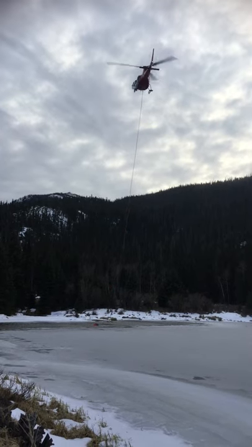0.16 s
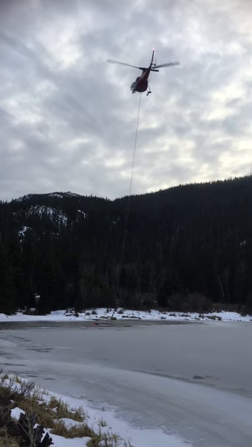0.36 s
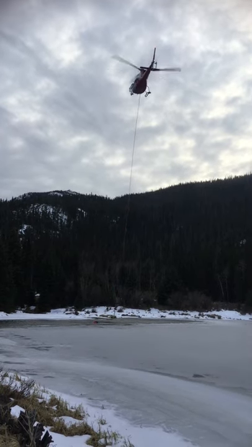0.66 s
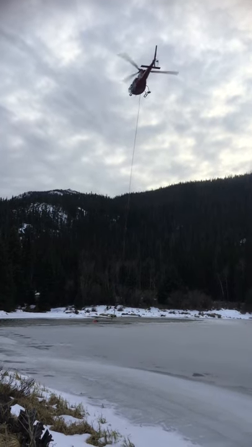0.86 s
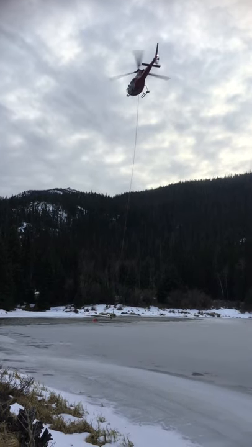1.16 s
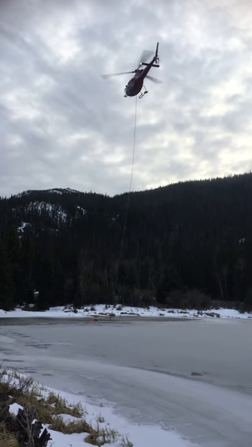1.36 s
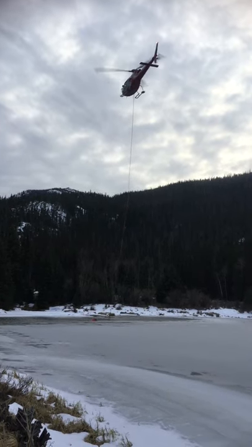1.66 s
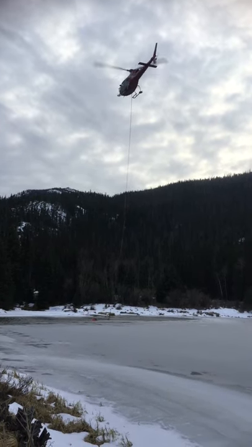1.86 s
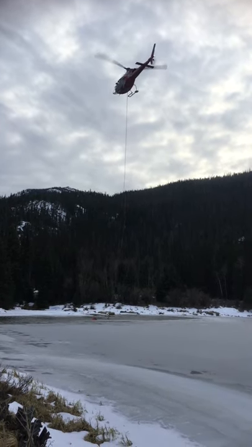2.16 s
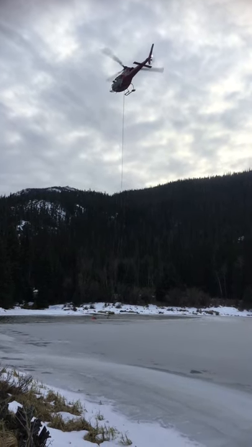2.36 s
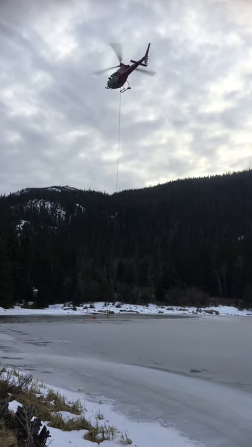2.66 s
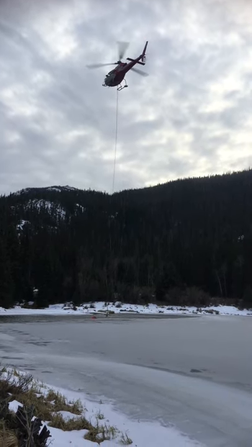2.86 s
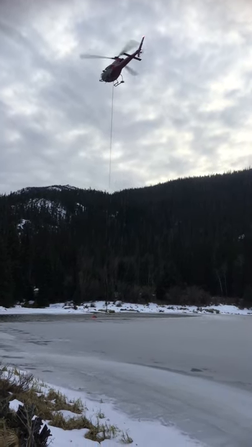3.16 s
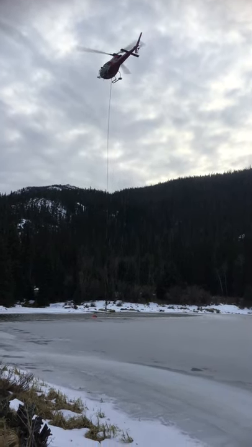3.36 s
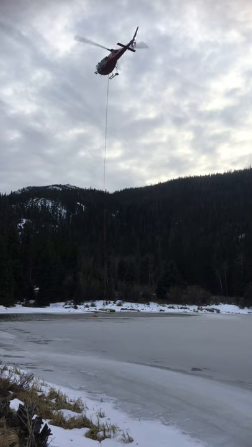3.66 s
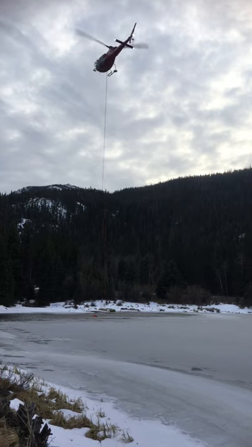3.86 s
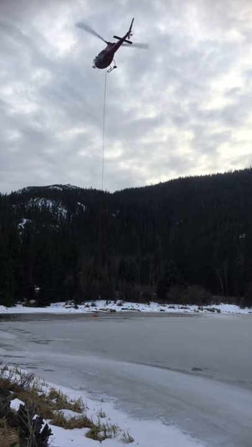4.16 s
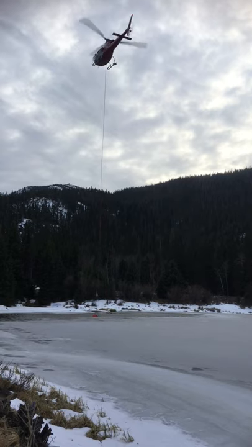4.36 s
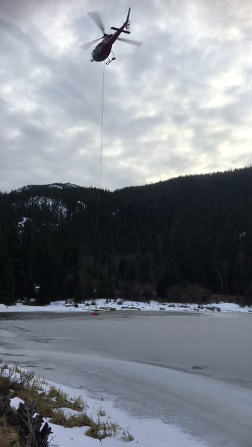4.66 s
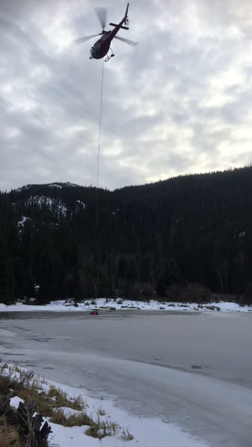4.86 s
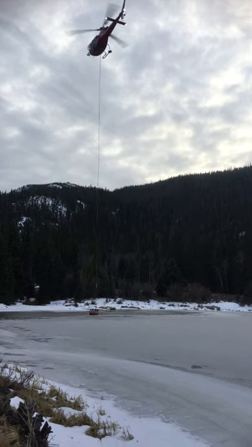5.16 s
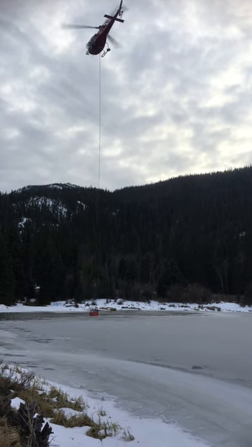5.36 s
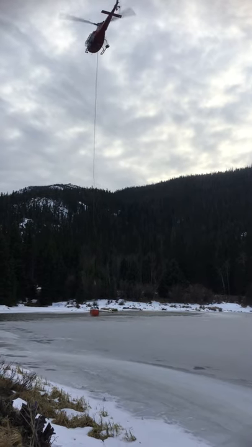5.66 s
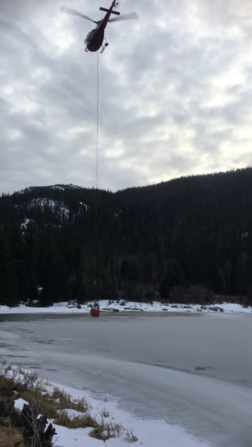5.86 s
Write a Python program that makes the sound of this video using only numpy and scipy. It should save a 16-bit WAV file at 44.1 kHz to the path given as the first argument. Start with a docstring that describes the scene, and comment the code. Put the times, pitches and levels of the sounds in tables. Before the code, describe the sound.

From 0 s a light turbine helicopter is already hovering in open air over a frozen lake, heard from the shore. Its main blades slap about nineteen times a second, each a short hollow knock around 450-500 Hz with low thump, ragged bark and dry crack. Beneath run a wavering tail rotor hum near 137 Hz with higher harmonics, deep rumble, soft hiss and faint fuzzy gear tones. The slaps vary in weight; from about 2.3 to 3.8 s cracks become sharper, the hardest near 3.4 s. They weaken towards 4 s and nearly disappear by 4.4 s. Until about 5.5 s the hum, rumble and hiss remain, with a thin, flickering whine near 8.6 kHz and a fainter whistle above; hiss swells around 5.1 s. At about 5.6 s strong slapping abruptly returns and continues to the cut at 6 s. A dull echo follows within milliseconds, giving a slightly hollow colour.

```python
"""On the shore of a frozen lake, a light turbine helicopter is heard hovering over the ice.
The main blades slap through their own wake, fade as the craft turns and come back hard: each slap is
built from short waves, noise and a crack. The tail rotor hums in harmonics, the gears and turbine sound as
fuzzy tones, and shaped noise makes the rumble and hiss. The ice returns a dull echo milliseconds later."""
import sys
import numpy as np
from scipy import signal
from scipy.io import wavfile
from scipy.ndimage import uniform_filter1d

SR = 44100
rng = np.random.default_rng(int(sys.argv[2]) if len(sys.argv) > 2 else 0)


def master_out(mix):
    """Clip the mix to full scale and print it as 16-bit PCM to the path in sys.argv[1]."""
    frames = np.transpose(np.atleast_2d(mix))
    ceiling = np.clip(frames, -1, 1)
    pcm = np.round(ceiling * 32767).astype(np.int16)
    wavfile.write(sys.argv[1], SR, pcm)


def invert_db(x):
    """Field ratio 10**(x/20) for x, a level in decibels (scalar or array-like)."""
    u = np.asarray(x, float) / 20
    return 10 ** u


N = 265482
TIME = np.arange(N) / SR  # seconds
BLADES_HZ = 19.46  # average rate of main blade passes

# How late the echo off the ice arrives: time_s, delay_ms
ICE_ECHO = [(0, 6.08), (2.5, 6.16), (4, 5.804), (5, 6.4), (6.02, 6.52)]


def curve(rows):
    """Joins the columns of a table by straight lines in time; the first column is the time."""
    time_s, *columns = np.transpose(rows)
    return [np.interp(TIME, time_s, column) for column in columns]


def evened(x):
    """Scales to rms 1, so that a level can be set afterwards."""
    return x / np.sqrt(np.mean(x ** 2) + 1e-20)


def add(mix, time_s, sound):
    """Mixes a sound in, centred on time_s and cut off at the ends of the mix."""
    start = round(time_s * SR) - len(sound) // 2
    part = mix[max(start, 0):start + len(sound)]
    part += sound[max(-start, 0):][:len(part)]


def resonate(x, hz, width_hz):
    """Keeps a band around hz: shifts it down to zero, smooths twice (width_hz each) and shifts it back."""
    turn = np.exp(2j * np.pi * np.cumsum(hz * np.ones(len(x))) / SR)
    r = np.exp(-np.pi * width_hz / SR)
    low = x / turn
    for _ in range(2):
        low = signal.lfilter([1 - r], [1, -r], low)
    return evened((turn * low).real)


def wander(per_s):
    """A random curve of rms 1 that takes per_s new values each second."""
    count = int(7 * per_s) + 2
    return evened(np.interp(TIME * per_s, np.arange(count), rng.standard_normal(count)))


def noise(spectrum, patchy_db, size):
    """Noise from random short-time spectra, with patches that swell and fade by patchy_db (rms)."""
    frames, hz = N * 4 // size + 5, np.fft.rfftfreq(size, 1 / SR)
    real, imaginary, patches = rng.standard_normal((frames, len(hz), 3)).T
    patches = uniform_filter1d(patches, size=6, axis=0)  # across pitch
    patches = evened(uniform_filter1d(patches, size=12, axis=1))  # across time
    table_hz, table_db = np.transpose(spectrum)
    shape_db = np.interp(np.log(hz + 1), np.log(table_hz), table_db)[:, None]
    z = (real + 1j * imaginary) * invert_db(shape_db + patchy_db * patches)
    return evened(signal.istft(z, nperseg=size, noverlap=size * 3 // 4)[1][:N])


def blade_turns():
    """Blade passes counted from the start, a whole number at each slap."""
    # The slap drifts against the even rotor clock: time_s, late_ms
    lag = [(0, -3.5), (0.4, -4.5), (0.8, -3.5), (1.2, -4), (1.6, -2.5), (2, -0.5), (2.4, 1.26), (2.8, 1.27),
           (3.2, -0.84), (3.6, -2), (4, -5), (4.3, -8), (5.6, -0.5), (6.02, -2)]
    return (TIME - curve(lag)[0] / 1000) * BLADES_HZ


def gate(turns, place, sharp):
    """A bump once a blade pass, at the share "place" of a pass after the slap."""
    return np.exp(sharp * (np.cos(2 * np.pi * (turns - place)) - 1))


def rotor_beat(turns):
    """The loaded blades push the air in a low beat, made of the lowest multiples of the blade rate."""
    # Mix of the beat: multiple, relative_level_db
    beat = [(1, -19), (2, -4.5), (3, 0), (4, 0)]
    # Level of the whole beat: time_s, level_db
    push = [(0, -39.5), (1.39, -31.5), (2.83, -37), (6.02, -39)]
    waves = sum(invert_db(db) * np.cos(2 * np.pi * multiple * (turns - .3)) for multiple, db in beat)
    return invert_db(curve(push)[0]) * evened(waves)


def tail_rotor():
    """The tail blades hum at multiples of their rate, each wavering in the downwash."""
    # Tail rotor: time_s, blade_rate_hz, level_db
    tail = [(0, 68.9, -30.5), (.8, 69.42, -25), (1.5, 67.96, -30.5), (2.3, 68.6, -26), (3, 67.44, -30.5),
            (3.7, 68.14, -23.5), (4.5, 69.78, -24.5), (5.2, 69.24, -25), (6.02, 68.54, -27)]
    # Mix of the hum before wavering: multiple, relative_level_db
    tail_orders = [(1, -25), (2, 2), (3, -3), (4, -11), (5, -10.5), (6, -16), (7, -17)]
    hz, level_db = curve(tail)
    tail_turns = np.cumsum(hz) / SR
    hum = 0
    for multiple, db in tail_orders:
        hum = hum + invert_db(db + 0.5 * wander(6.9)) * np.cos(2 * np.pi * multiple * tail_turns)
    return invert_db(level_db) * hum


def gearbox():
    """Meshing gear teeth give faint, slightly fuzzy tones: narrow bands of noise."""
    # Gear tones, before they waver: pitch_hz, level_db
    gears = [(1505, -53.5), (1715, -55)]
    return sum(invert_db(db + 2.4 * wander(2.7)) * resonate(rng.standard_normal(N), hz, 87) for hz, db in gears)


def air(turns):
    """The downwash rumbles; the exhaust hisses and swells as a blade swishes past."""
    # Air and exhaust, the hiss before its swells: time_s, rumble_db, hiss_db
    air_levels = [(0.0, -23, -41.5), (1.78, -25, -40.5), (3.15, -23, -40), (4.26, -26, -41.5),
                  (5.13, -25, -37), (6.02, -24, -41.5)]
    # Tone colour of the rumble: pitch_hz, relative_level_db
    rumble_colour = [(30, -38), (90, -17.5), (170, -1), (215, 3), (255, -10), (320, -8.5), (390, -13),
                     (500, -9.5), (660, -18), (810, -17), (1300, -30.5), (2200, -48.5)]
    # Tone colour of the hiss: pitch_hz, relative_level_db
    hiss_colour = [(500, 6.5), (1200, -8.5), (2800, 3), (4000, -3.5), (7500, -7.5), (10500, -6.5),
                   (12000, -31), (13500, -30), (16000, -16.5)]
    rumble_db, hiss_db = curve(air_levels)
    rumble = invert_db(rumble_db) * noise(rumble_colour, patchy_db=1.0, size=2048)
    swish = 1 + .5 * gate(turns, 0.28, 6.4)
    hiss = invert_db(hiss_db) * swish * noise(hiss_colour, patchy_db=1.35, size=512)
    return rumble + hiss


def turbine(turns):
    """The turbine gives two tones, made fuzzy as the moving air scatters them."""
    # Whine heard when the intake faces the shore, before flares and wavering: time_s, pitch_hz, level_db
    whine_path = [(0, 8310, -48.5), (.47, 8460, -44), (1.75, 9000, -55.5), (1.87, 8700, -45.5),
                  (2.5, 8760, -42.5), (2.68, 9000, -64), (3.96, 8680, -61), (4.05, 8700, -43),
                  (4.46, 8550, -46.5), (4.52, 8540, -42.5), (5.0, 8620, -41.5), (5.3, 8700, -39.5),
                  (5.58, 8800, -48), (6.02, 8660, -65)]
    # Brief flares of the whine: middle_s, half_length_s, rise_db
    flares = [(1.89, .03, 7), (2.085, 0.015, 14), (2.244, .01, 14), (2.287, .02, 9), (2.4, 0.047, 6.5),
              (2.49, 0.011, 8), (4.105, 0.0083, 12.5), (4.256, .012, 11), (4.57, 0.074, 11),
              (4.695, 0.021, 10), (4.93, 0.01, 13.5), (5.167, 0.01, 15), (5.325, .015, 8.5)]
    # Higher whistle that each passing blade uncovers: time_s, pitch_hz, level_db
    whistle_path = [(0, 10200, -61), (.99, 10500, -48), (1.31, 11100, -60), (2.4, 11000, -53),
                    (4.39, 10800, -50.5), (4.71, 10400, -47.5), (6.02, 11300, -58)]
    hz, db = curve(whine_path)
    flare_db = sum(rise_db * np.exp(-((TIME - s) / length) ** 2) for s, length, rise_db in flares)
    whine = invert_db(db + flare_db + 2.0 * wander(40)) * resonate(rng.standard_normal(N), hz, 450)
    hz, db = curve(whistle_path)
    chop = evened(0.26 + gate(turns, 0.39, 5.3) * invert_db(3.7 * wander(17)))
    whistle = invert_db(db) * chop * resonate(rng.standard_normal(N), hz, 670)
    return whine + whistle


def train(t, hz, length_s, slowing):
    """A blade meets vortices in a row: a few pressure waves, ever wider apart."""
    return evened(np.exp(-(t / length_s) ** 2) * np.sin(2 * np.pi * hz * t * (1 - slowing * t)))


def ragged_bark(t, swirl, rise):
    """The churned wake barks: a short burst of noise in a few bands, all raised in pitch by "rise"."""
    # Bands of the bark: pitch_before_rise_hz, smoothing_width_hz, relative_level_db
    bands = [(687, 74, 0), (803, 70, 0), (1197, 81, -6), (1582, 290, -11)]
    bark = sum(invert_db(db) * resonate(swirl, hz * rise, width) for hz, width, db in bands)
    return evened(np.exp(-((t - .002) / 0.0079) ** 2) * bark)


def sharp_crack(t, grit, half_length_s, grit_share):
    """A sharp burst of noise with peak 1, which turbulence spreads into longer grit."""
    smear = grit_share * np.exp(-((t - .001) / 0.0078) ** 2)
    crack = (np.exp(-(t / half_length_s) ** 2) + smear) * resonate(grit, 2150, 2840)
    return crack / abs(crack).max()


def slaps(turns):
    """Each blade cuts the vortices ahead of it: two wave trains, a bark, a thump, a push and a crack."""
    # Wave trains as the craft turns and rocks, before chance: time_s, pitch_hz, wave_db, lower_wave_db
    wave_path = [(0, 432, -22, -20.5), (.15, 417, -20, -21.5), (.22, 440, -28, -35), (.41, 432, -19.5, -21),
                 (.52, 454, -23.5, -31), (.87, 475, -20.5, -25.5), (1.0, 442, -20, -29),
                 (1.24, 511, -18.5, -20), (1.5, 485, -22.5, -25), (1.78, 494, -19, -25),
                 (2.05, 479, -25.5, -23.5), (2.28, 480, -17, -23), (2.56, 482, -25, -27.5),
                 (2.7, 437, -16, -21.5), (3.03, 491.6, -20, -26.5), (3.12, 503, -22.5, -32),
                 (3.3, 544, -23, -27), (3.5, 515, -19, -26.5), (3.62, 510, -30.5, -27),
                 (3.82, 527, -22.5, -29), (4.0, 480, -32.5, -28.5), (4.3, 517, -34.5, -32.5),
                 (4.4, 510, -63, -54), (5.59, 485, -43, -60), (5.64, 492, -17, -25.5),
                 (5.91, 433.8, -16, -18), (5.96, 455, -26, -16.5), (6.02, 472, -23, -22)]
    # Low end of the slap: time_s, thump_db, deep_push_db
    lows = [(0, -36, -15.5), (.3, -22, -33), (.8, -27.5, -34), (1.05, -34, -33), (1.3, -29, -19),
            (1.8, -16, -29.5), (2.05, -21, -16.5), (2.3, -28, -20.5), (2.55, -17.5, -18), (2.8, -25, -13),
            (3.05, -22.5, -22.5), (3.3, -22.5, -31.5), (3.7, -25.5, -21.5), (4.05, -36, -36),
            (4.4, -63, -70), (5.5, -51, -60), (5.68, -23, -48), (5.85, -21, -23), (6.02, -43, -25.5)]
    # Ragged top of the slap, before chance: time_s, bark_db, usual_crack_peak_db
    tops = [(0, -32.5, -17.5), (.3, -30, -23.5), (.45, -33.5, -25.5), (.9, -29, -28), (1.3, -28, -19.5),
            (1.7, -31, -22), (1.95, -28, -25.5), (2.3, -34, -19), (2.8, -30, -19.5), (3.5, -28.5, -22),
            (3.62, -37.5, -32), (3.8, -34, -26), (4.05, -43, -26), (4.3, -47, -23.5), (4.4, -59, -60),
            (5.52, -39, -54), (5.62, -28, -19.5), (5.85, -29.5, -28), (6.02, -27.5, -20.5)]
    # Sharpest cracks, in place of the usual ones: time_s (just ahead of the crack's middle), peak_db
    sharpest = [(1.3264, -18.5), (1.4283, -19.5), (2.359, -14.5), (2.4126, -13), (2.4606, -16.5),
                (2.5144, -12.5), (2.8222, -15), (2.9248, -17), (3.027, -14.5), (3.0794, -16.5),
                (3.285, -18.5), (3.3363, -13), (3.3872, -19), (3.4383, -8), (3.489, -14.5), (3.7447, -16.5),
                (3.7949, -15), (5.6925, -18), (5.8985, -18), (5.9499, -14)]
    wave_spread_db, lower_spread_db, crack_spread_db = 1.5, 1.5, 1.5  # chance from pass to pass
    crack_lead_s, crack_spread_s = .004, .003  # the usual crack tends to come before the middle of the slap
    crack_half_s, least_grit = 0.000878, .12

    out, t = np.zeros(N), np.arange(-1024, 1024) / SR
    passes = np.interp(np.arange(1, int(turns[-1]) + 1), turns, TIME)  # time of each slap
    wake = rng.standard_normal((len(passes), 2048))
    wake = signal.lfilter([1], [1, -.6], wake, axis=0)  # alike from pass to pass
    fresh = rng.standard_normal((len(passes), 2048))
    shape = np.array(curve(wave_path) + curve(lows) + curve(tops))
    rise = 5.992 / curve(ICE_ECHO)[0]  # the bark bands climb as the echo path shortens
    for s, swirl, grit in zip(passes, wake, fresh):
        at = round(s * SR)
        hz, wave_db, lower_db, thump_db, deep_db, bark_db, crack_db = shape[:, at]
        # The first noise values also serve as this pass's chances
        hz_luck, bark_luck, wave_luck, lower_luck, time_luck, crack_luck, lower_hz_luck = grit[:7]

        wave_db += wave_spread_db * wave_luck
        waves = invert_db(wave_db) * train(t, hz * (1 + 0.046 * hz_luck), 0.0059, 7.5)
        loose_vortices = np.exp(-((t - .002) / 0.01) ** 2) * resonate(swirl, hz, 167)
        waves += invert_db(wave_db - 4.0) * evened(loose_vortices)
        lower = train(t + .001, 342 * (1 + 0.034 * lower_hz_luck), 0.01, 4)
        waves += invert_db(lower_db + lower_spread_db * lower_luck) * lower
        waves += invert_db(thump_db) * train(t, 211, 0.0072, 9.1)
        waves -= invert_db(deep_db) * train(t - .002, 130.0, 0.0081, 1.3)
        waves += invert_db(bark_db + 1.94 * bark_luck) * ragged_bark(t, swirl, rise[at])
        add(out, s - .001, waves)

        crack_s = s - crack_lead_s + crack_spread_s * time_luck
        crack_db += crack_spread_db * crack_luck
        for listed_s, listed_db in sharpest:
            if abs(listed_s - s) < .5 / BLADES_HZ:
                crack_s, crack_db = listed_s + crack_half_s, listed_db
                break
        grit_share = least_grit + invert_db(bark_db - crack_db - 3)
        add(out, crack_s, invert_db(crack_db) * sharp_crack(t, grit, crack_half_s, grit_share))
    return out


def ice_echo(direct):
    """The rough ice sends the sound back weaker, late and without its treble."""
    dull = signal.filtfilt(*signal.butter(2, 900, fs=SR), direct)
    return 0.16 * np.interp(TIME - curve(ICE_ECHO)[0] / 1000, TIME, dull)


def scene():
    """Adds up the sounds of the helicopter and their echo off the ice."""
    turns = blade_turns()
    direct = rotor_beat(turns) + tail_rotor() + gearbox() + air(turns) + turbine(turns) + slaps(turns)
    return (direct + ice_echo(direct))[None]


def band_limit(x):
    """A steep low-pass at the top of the band."""
    return signal.sosfilt(signal.butter(12, 15800, fs=SR, output="sos"), x)


def record(dry):
    """The microphone rolls off deep bass and high treble, and the loudest slaps bend at a knee."""
    knee = .7  # full scale is 1
    no_deep_bass = signal.lfilter(*signal.butter(2, 32, "high", fs=SR), dry)
    heard = signal.lfilter(*signal.butter(4, 11300, fs=SR), no_deep_bass)
    bent = heard / (1 + abs(heard / knee) ** 8) ** (1 / 8)
    return band_limit(bent)


dry = scene()
out = record(dry)
master_out(out)
```